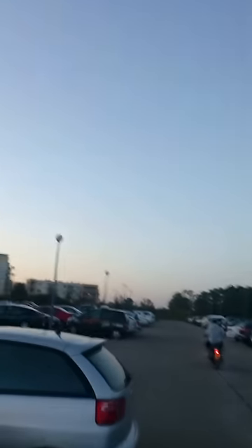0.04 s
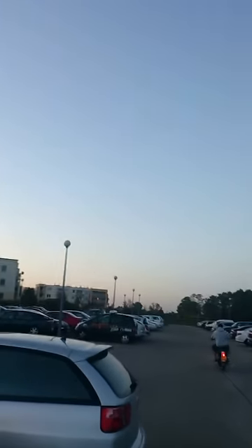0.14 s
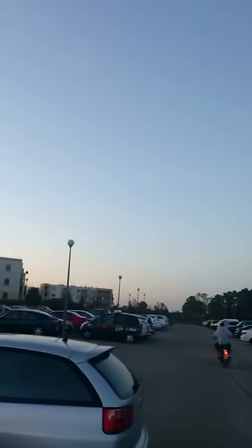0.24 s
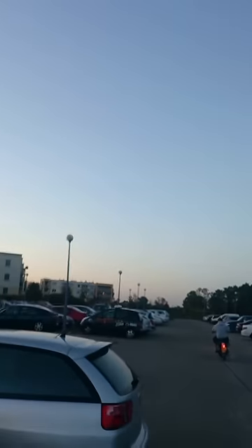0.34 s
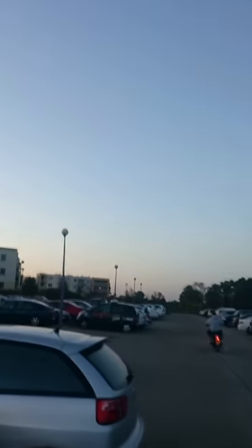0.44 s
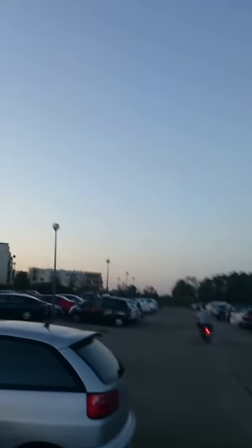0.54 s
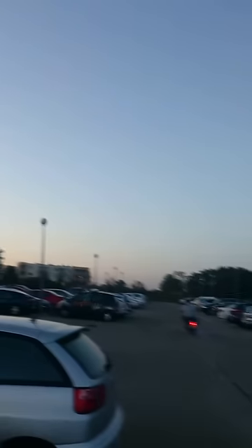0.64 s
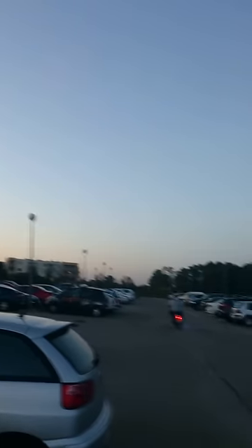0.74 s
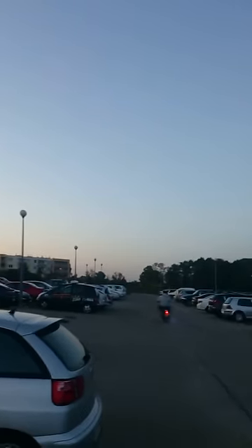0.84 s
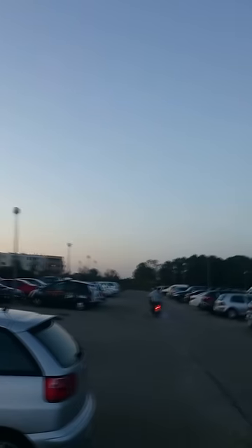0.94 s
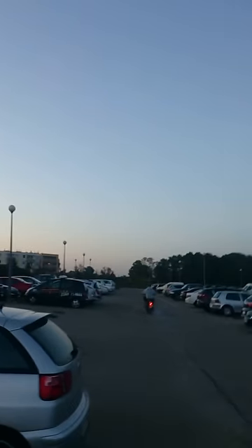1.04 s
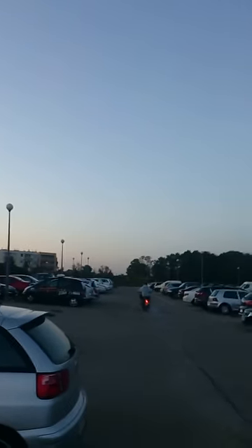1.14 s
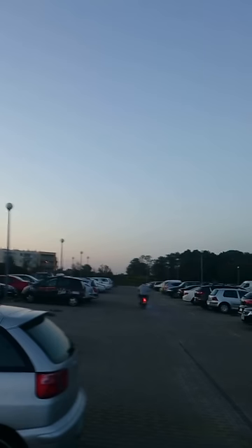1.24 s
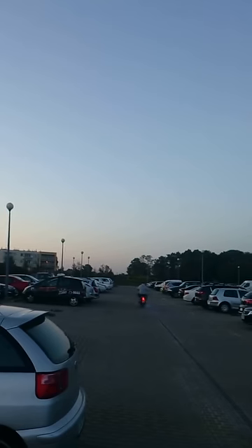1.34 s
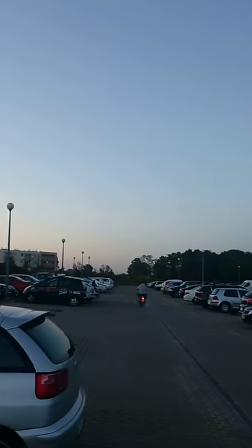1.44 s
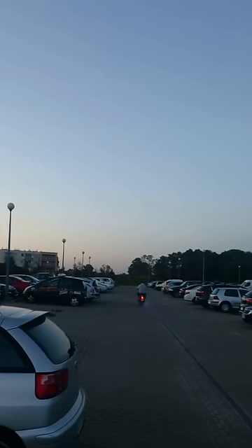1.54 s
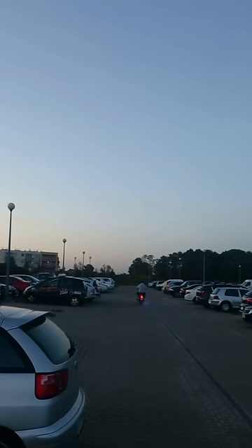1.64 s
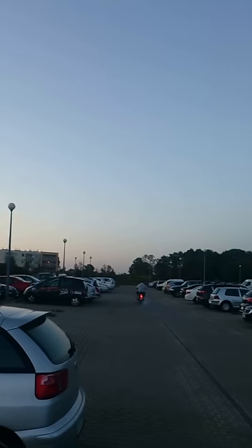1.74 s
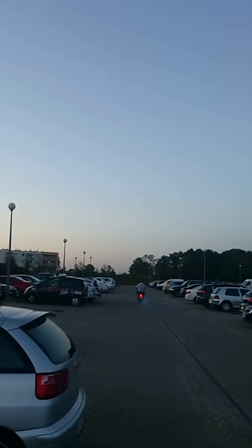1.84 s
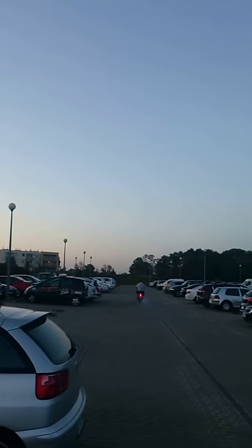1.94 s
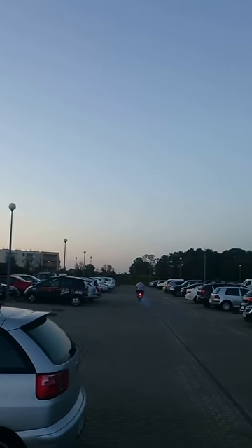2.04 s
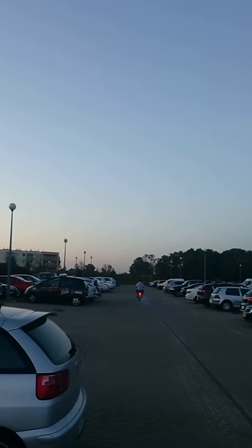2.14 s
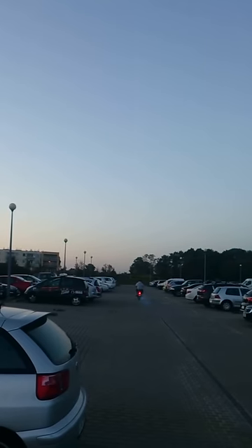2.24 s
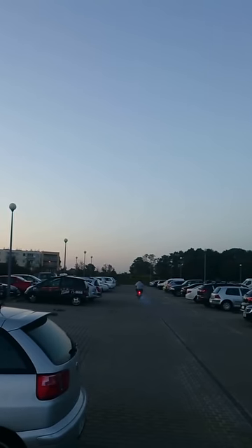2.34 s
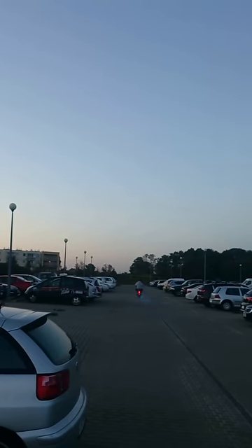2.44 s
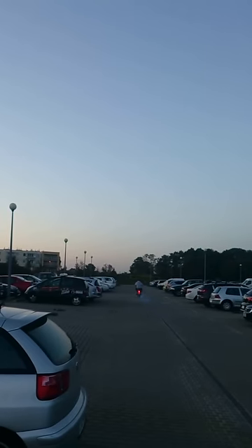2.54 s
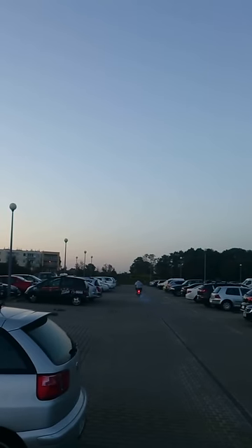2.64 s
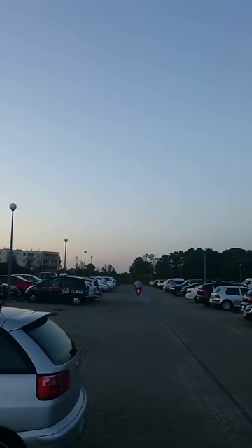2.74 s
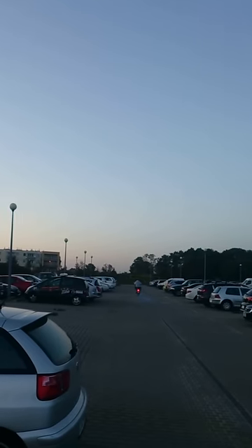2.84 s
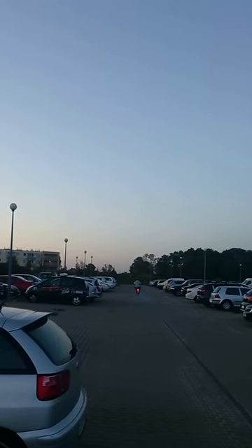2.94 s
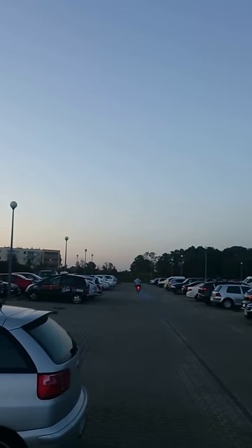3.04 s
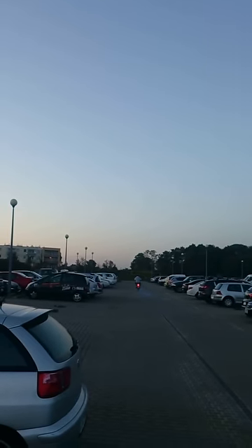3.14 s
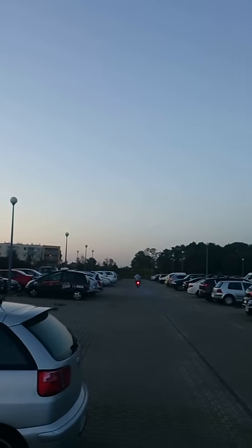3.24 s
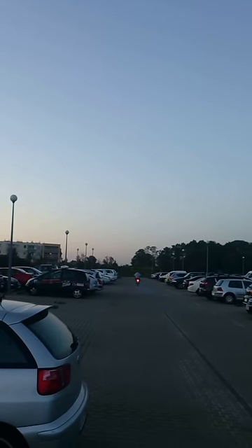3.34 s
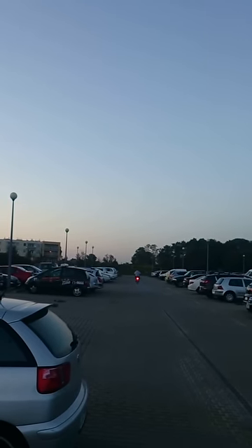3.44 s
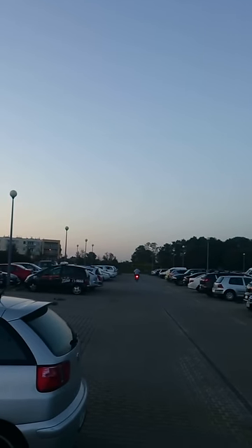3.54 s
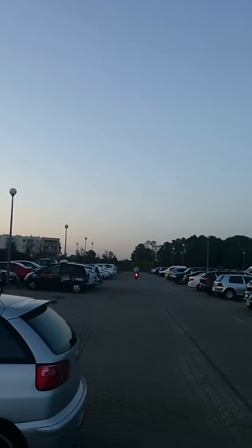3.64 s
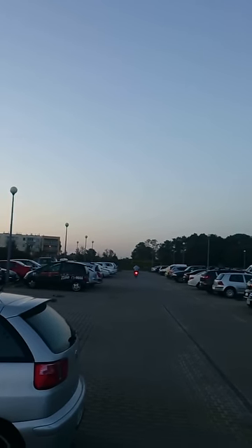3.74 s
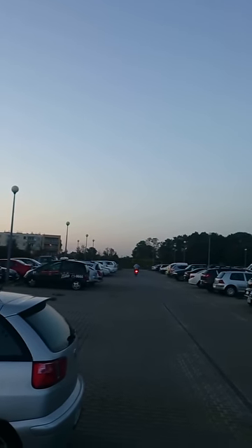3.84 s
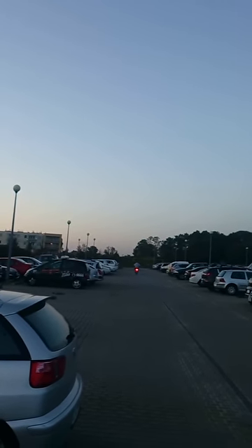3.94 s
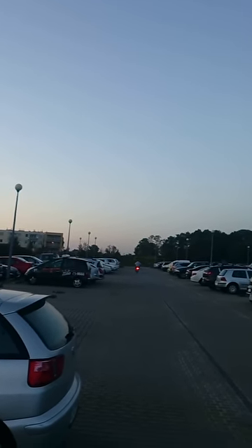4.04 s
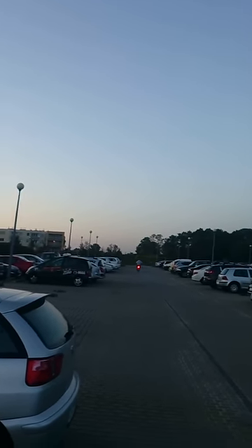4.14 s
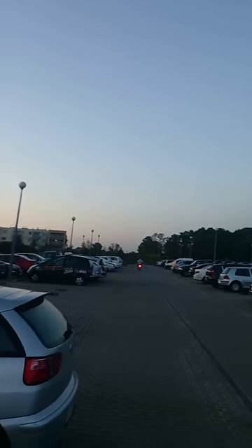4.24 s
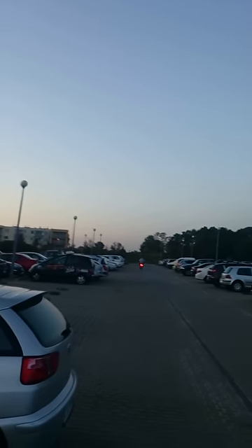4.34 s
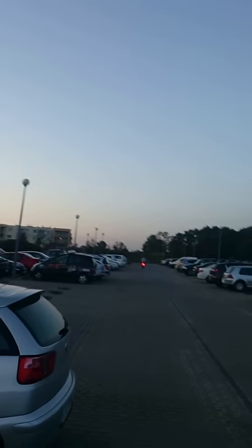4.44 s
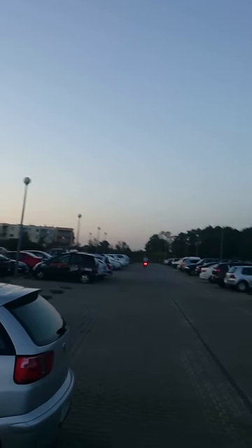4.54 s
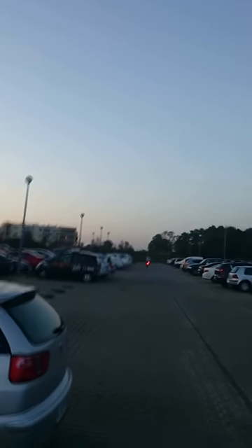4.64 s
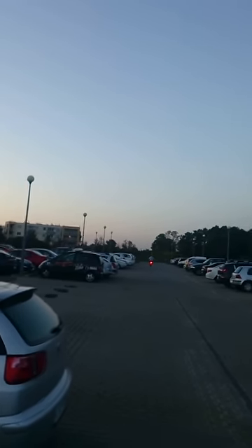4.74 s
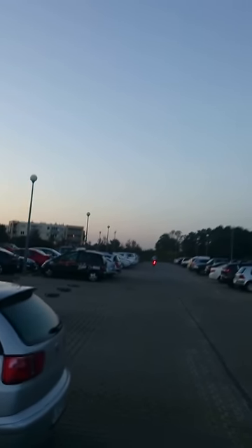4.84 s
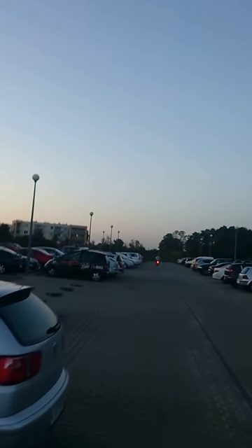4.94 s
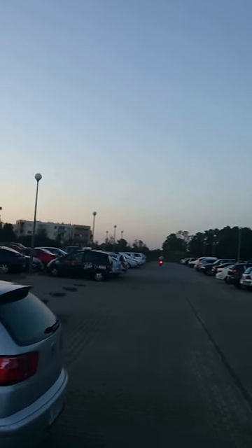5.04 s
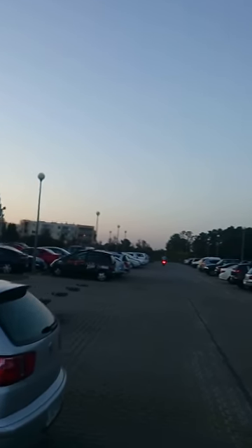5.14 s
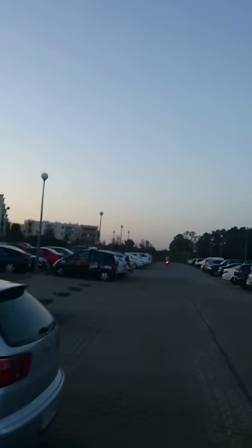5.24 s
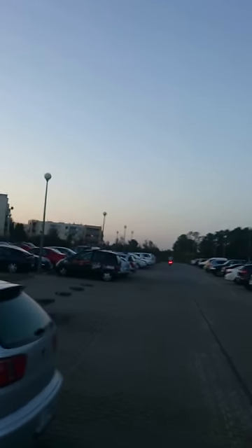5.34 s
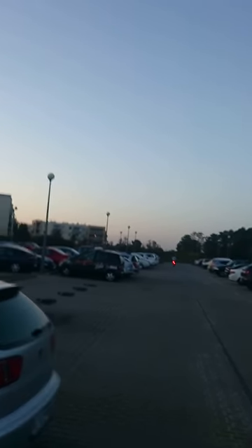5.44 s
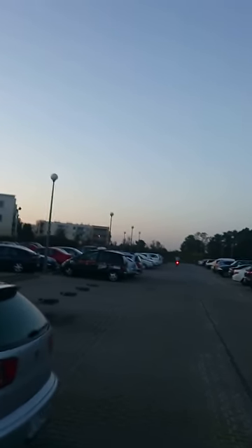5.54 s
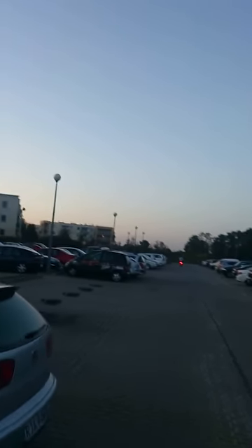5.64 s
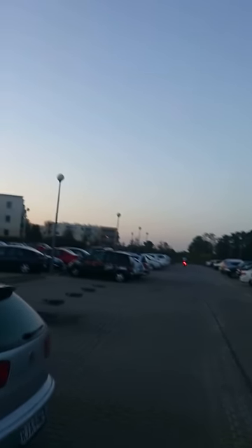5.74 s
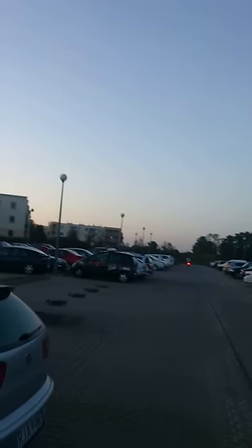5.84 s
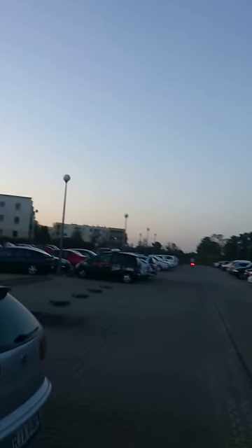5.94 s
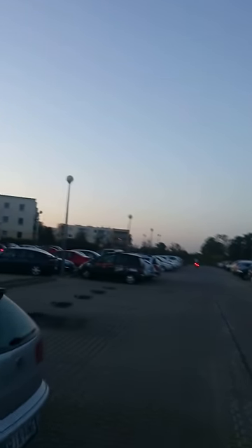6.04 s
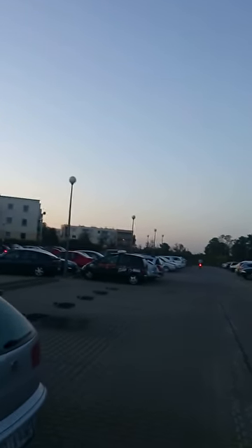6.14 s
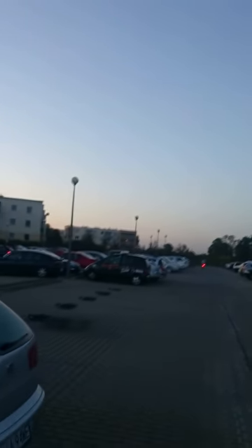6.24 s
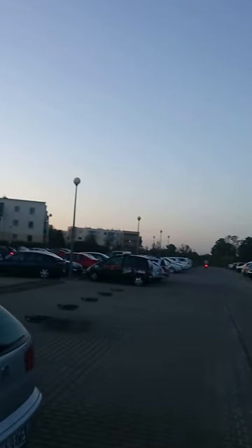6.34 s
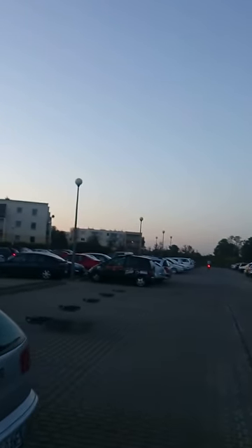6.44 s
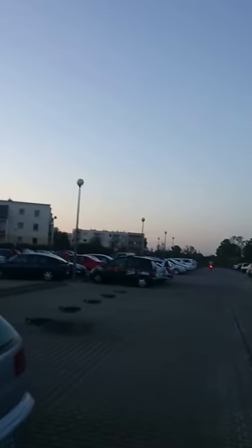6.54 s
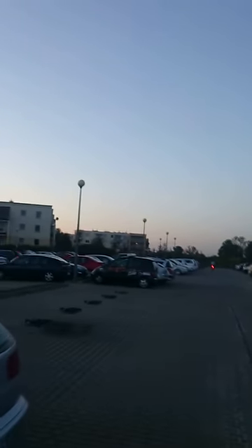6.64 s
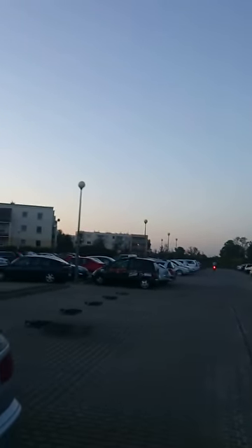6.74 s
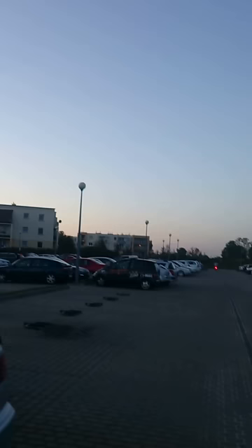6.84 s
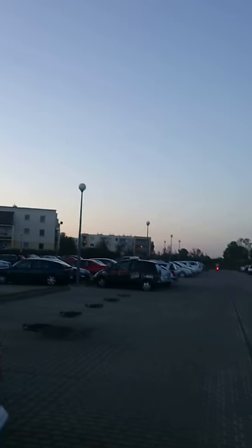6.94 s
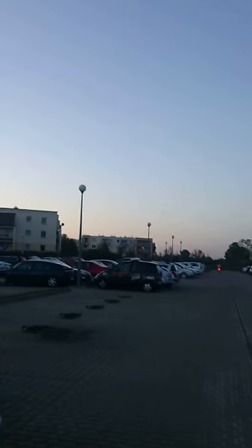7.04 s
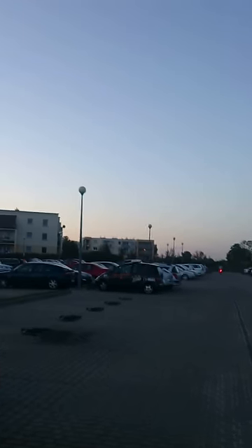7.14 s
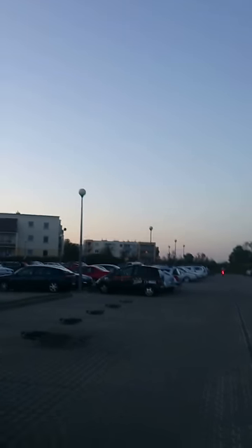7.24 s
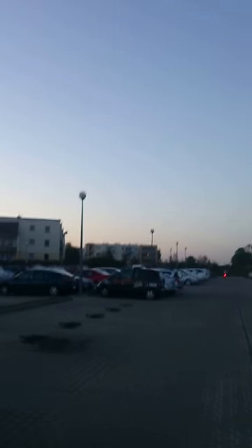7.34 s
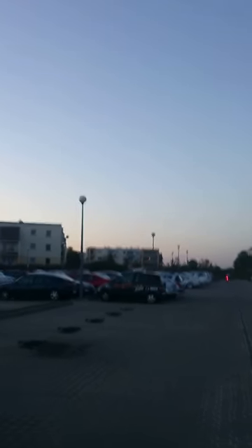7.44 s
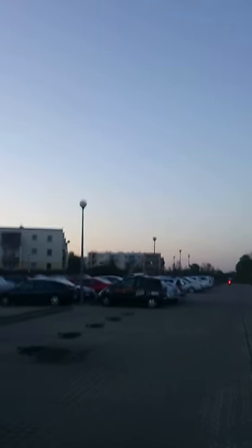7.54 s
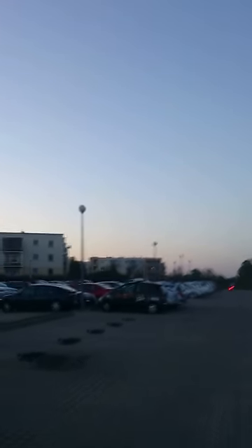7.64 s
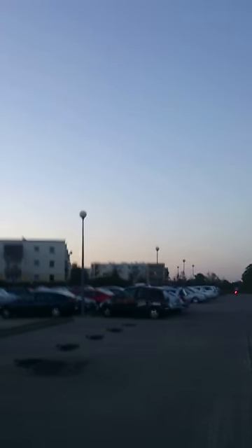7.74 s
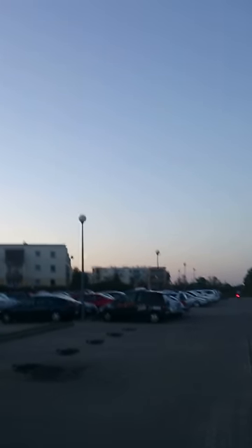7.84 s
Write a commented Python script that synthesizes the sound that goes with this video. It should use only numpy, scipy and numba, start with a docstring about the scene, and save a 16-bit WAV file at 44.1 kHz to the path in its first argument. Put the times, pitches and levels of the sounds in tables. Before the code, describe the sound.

A small two-stroke motorcycle, already close, accelerates away with a loud, raspy buzz rising for a second. A few separate pops mark the gear change, then a lower, quieter second pull drones on for nearly two seconds. The throttle closes and it coasts off in irregular little bursts, growing faint. Open car park, short reflections off parked cars, soft breeze and far traffic, handheld stereo microphone.

```python
"""A car park: a small two-stroke motorcycle pulls away, two pulls under load with a gear change between,
then coasts off firing only in bursts. Each firing kicks resonators for the exhaust pipe, chamber, tailpipe
and cylinder fins, with noise for the turbulent gas; unfired strokes only pump softly. Decaying noise makes
the echoes off parked cars and far buildings; shaped noise makes the light breeze and far traffic beneath."""
import sys
import numpy as np
from scipy import signal
from scipy.fft import rfft, irfft, next_fast_len
from scipy.io import wavfile
from numba import njit

SR = 44100
rng = np.random.default_rng(int(sys.argv[2]) if len(sys.argv) > 2 else 0)


def unload_audio(sound):
    """Save the sound as a 16-bit wav file, at the path given as the first command line argument."""
    columns = np.transpose(np.atleast_2d(sound))
    # keep every value between -1 and 1, then stretch to whole-number steps
    steps = np.round(np.clip(columns, -1, 1) * 32767)
    wavfile.write(sys.argv[1], SR, steps.astype(np.int16))


N = 348390

# engine speed through each pull, climbing in surges: (time [s], firing rate [1/s])
PULL_SPEED = [
    [(0.01, 62.6), (0.065, 63.3), (0.098, 61.0), (0.13, 60.9), (0.178, 64.2), (0.302, 65.4), (0.355, 68.8),
     (0.42, 67.3), (0.478, 70.9), (0.51, 71.2), (0.55, 69.8), (0.59, 71.2), (0.674, 73.4), (0.725, 69.9),
     (0.799, 75.6), (0.878, 75.4), (0.944, 76.6), (0.997, 74.6), (1.03, 76.5)],
    [(1.335, 56.7), (1.41, 55.2), (1.47, 56.4), (1.53, 56.2), (1.59, 57.6), (1.67, 56.4), (1.73, 57.6),
     (1.805, 55.3), (1.85, 57.8), (1.995, 58.6), (2.047, 57.3), (2.09, 60), (2.165, 58.4), (2.25, 59.6),
     (2.302, 57.8), (2.352, 59.8), (2.42, 59.7), (2.465, 60.7), (2.519, 59.8), (2.575, 62.3), (2.625, 60.8),
     (2.715, 61.8), (2.756, 59.8), (2.813, 62.3), (2.93, 62.7), (2.98, 61.9), (3.037, 64), (3.075, 62.4),
     (3.142, 61.3)],
]
# firing level over each pull: (start level [dB], end level [dB])
PULL_LEVELS = [(-12.5, -14.5), (-20.5, -18)]
# firing bursts off the throttle: (first firing [s], last firing [s], firings [count], burst level [dB],
# first firing below it by [dB], fade to the last [dB], tailpipe brightness [dB])
BURSTS = [(1.055, 1.056, 1, -13, 2, 0, -1), (1.113, 1.124, 2, -15.5, 13, 0, 0),
          (1.205, 1.206, 1, -14, 1, 4, 0), (1.275, 1.274, 1, -14.5, 0.5, 0, -2),
          (3.213, 3.232, 2, -22, -2.5, 0, -1), (3.32, 3.336, 2, -20.5, 0, 0, -0.5),
          (3.419, 3.435, 2, -19, 0.5, 0, 0.5), (3.518, 3.535, 2, -20, -3, 0, -1.5),
          (3.624, 3.641, 2, -21.5, -4, 0, 0), (3.727, 3.744, 2, -22, -3.5, 0, 0),
          (3.814, 3.849, 3, -19.5, 9, 1, 1.5), (3.92, 3.955, 3, -20, 4, 1, 0),
          (4.045, 4.063, 2, -21, -2, -2, 0.5), (4.134, 4.283, 9, -21.5, -2, 5, -1),
          (4.36, 4.433, 5, -21, 1.5, 4, 0), (4.513, 4.606, 6, -22.5, -3, 3, 0),
          (4.668, 4.748, 5, -25, 7, 3.5, 0.5), (4.767, 4.805, 3, -23.5, 2, 4.5, -1),
          (4.888, 4.97, 5, -23.5, 0, 7.5, -0.5), (5.038, 5.082, 3, -24.5, 3, 2, -1),
          (5.215, 5.236, 2, -23.5, 0.5, 0, 0.5), (5.293, 5.35, 4, -25.5, 0.5, 2.5, 1),
          (5.495, 5.547, 4, -22, 11, 9.5, 2.5), (5.695, 5.756, 5, -22, 5.5, 10.5, 1),
          (5.872, 5.938, 5, -22.5, 7, 11, -0.5), (6.064, 6.135, 5, -22, 8.5, 8.5, -0.5),
          (6.277, 6.297, 2, -36.5, -2.5, 2, -0.5), (6.332, 6.419, 6, -26.5, 8, 5.5, 0),
          (6.435, 6.504, 5, -26, 7, 7.5, -2), (6.623, 6.699, 5, -24.5, 12, 10, -1),
          (6.718, 6.769, 4, -30.5, 5, 9, 3), (6.961, 6.994, 3, -25, 4.5, 14, 0.5),
          (7.133, 7.227, 6, -25, 8.5, 4, 1.5), (7.388, 7.422, 3, -27, 6.5, 10.5, 0.5),
          (7.554, 7.618, 4, -26.5, 4, 0.5, -2), (7.791, 7.858, 4, -27, 4, 4.5, -2)]
# engine speed off the throttle: (time [s], crank speed [turns/s])
COASTING_SPEED = [(1, 74), (1.3, 70), (3, 59), (5, 52), (5.4, 55), (5.55, 61), (5.8, 60), (5.95, 56),
                  (6.2, 56), (8, 51)]
# unfired strokes re the level of the burst before them: (time [s], low pumping [dB], upper pumping [dB])
UNFIRED_LEVELS = [(1, -17, -13), (3.2, -16.5, -20), (3.9, -19.5, -17.5), (4.3, -18.5, -15.5),
                  (4.8, -15, -12), (5.15, -16, -17), (5.4, -13.5, -21), (5.6, -15, -11), (5.8, -18, -7.5),
                  (6.0, -16.5, -30), (6.2, -18.5, -25), (6.55, -16.5, -14), (6.9, -9.5, -18),
                  (7.3, -20, -23), (7.5, -16.5, -24), (7.9, -16, -18)]
THUMP_START_DB, THUMP_END_DB, THUMP_COASTING_DB = 1.5, -4, -5.5   # the bass thins as a pull runs out
UNEVEN_DB = 1.0   # random spread of firing level off the throttle
SURGE, SAG = .075, .055   # share by which firing speeds the crank up, and coasting slows it down
LOOSE_SPREAD = 2.2   # ragged firings off the throttle scatter the modes this many times more

# bass push of each firing: (frequency [Hz], width [Hz], level [dB])
THUMP_MODES = [(180, 91, -7.5), (266, 50, -13.5)]
# deeper bass push, above the boom: (frequency [Hz], width [Hz], level [dB])
THUD_MODES = [(108, 51, -24.5)]
# thud re firing: (time [s], level [dB])
THUD_LEVEL = [(0, -8.5), (.6, 2.5), (1.0, -1.5), (1.35, 1.5), (1.55, 12.5), (2.0, 6.5), (2.6, 0),
              (3.15, -5), (3.3, -17), (7.9, -16)]
# pipe before the gas heat shifts it: (frequency [Hz], width [Hz], level [dB])
PIPE_MODES = [(482.8, 43.2, -0.5), (633, 45, -19)]
# exhaust chamber, rings under load: (frequency [Hz], width [Hz], level [dB])
CHAMBER_MODES = [(378.3, 76, 0.026)]
# bark, rings off the throttle: (frequency [Hz], width [Hz], level [dB])
BARK_MODES = [(371, 67, 0.0019)]
# upper pipe: (frequency [Hz], width [Hz], level [dB])
UPPER_PIPE_MODES = [(766, 75, -12), (881.4, 71, -4.5), (983, 130, -7.5)]
# tailpipe: (frequency [Hz], width [Hz], level [dB])
TAILPIPE_MODES = [(1605, 105, 1.2), (1755, 115, 2.5)]
# tip of the tailpipe: (frequency [Hz], width [Hz], level [dB])
TAIL_TIP_MODES = [(2000, 150, 10), (1880, 180, 1)]
# front of the pressure wave: (frequency [Hz], width [Hz], level [dB])
BLAST_MODES = [(1123, 320, 6.6)]
# low exhaust boom: (frequency [Hz], width [Hz], level [dB])
BOOM_MODES = [(67.6, 47, -27)]
# exhaust balance re firing: (time [s], pipe [dB], chamber [dB], bark [dB], tailpipe [dB], tail tip [dB],
# boom [dB], blast [dB])
EXHAUST_BALANCE = [(0, 0.5, 3.5, -12, -1, 0, -1, 1.5), (.8, -4.5, 8.5, -11, -5.5, 3, 7, 3),
                   (1.3, 0.5, 1, -2, -2, 5.5, 0, -1), (1.7, -5, 5.5, -12.5, 3, 4.5, 4, 2.5),
                   (3.15, -6.5, 4, -20, 1.5, 5, -17, 1.5), (3.3, 0, -2, -1.5, 2, 6, -17, 3),
                   (4.3, -3, -35, 1.5, 3.5, -2, -1, 1), (5.5, 3.5, -16, 4, 0.5, -5, -18, 0),
                   (6.8, 3, -16, 1.5, 1, -20, -7.5, 0), (7.9, -1.5, -20, 0.5, -9.5, -15.5, -13, -19)]
RETURN_S, RETURN_DB = .0064, -1   # the wave thrown back by the chamber cone kicks the tailpipe again
BAFFLE_LEAK = 0.44   # share that passes the baffle

# mid-treble exhaust rasp: (frequency [Hz], width [Hz], level [dB])
RASP_MODES = [(2458, 80, -12), (2894, 172, -12.5), (3370, 256, -12), (3836, 104, -23)]
# rasp re firing: (time [s], level [dB])
RASP_LEVEL = [(0, 5), (.5, 11), (1.0, 10.5), (1.5, 6.5), (2.6, 12.5), (3.1, 3), (3.5, 3.5), (4.3, -5),
              (5.3, -10), (6.7, 1.5), (7.9, -14)]
# cylinder fins: (frequency [Hz], width [Hz], level [dB])
FIN_MODES = [(5208, 370, -1), (5080, 800, -14), (5630, 760, -12.5)]
# hiss of the escaping gas: (frequency [Hz], width [Hz], level [dB])
GAS_HISS_MODES = [(7050, 600, -8.5), (8800, 1670, -13), (10660, 1700, -16)]
# treble balance re firing: (time [s], fin rattle [dB], crack [dB], gas hiss [dB])
TREBLE_BALANCE = [(0, -15.5, 16, -11.5), (.2, -25, -31, -13.5), (.5, -29.5, -39, -19.5),
                  (.77, -18, 18.5, -14.5), (1.0, -25.5, 1, -21), (1.35, -19, 6, -19),
                  (1.75, -23, -0.5, -27), (1.9, -18.5, 6.5, -21), (2.04, -22.5, 4, -21),
                  (2.27, -15, 12, -20), (2.57, -18.5, 13, -17.5), (2.96, -29.5, -3.5, -26.5),
                  (3.12, -24, 2.5, -30), (3.8, -24.5, -1.5, -29), (4.25, -17, -8, -44),
                  (4.6, -32.5, -14, -43), (5.65, -24, -15.5, -34.5), (6.4, -29.5, -31, -30),
                  (7.9, -36.5, -32, -43)]
# low pumping of unfired strokes: (frequency [Hz], width [Hz], level [dB])
PUMPING_MODES = [(225.3, 43, -1.5), (267, 58, -12)]
# upper pumping of unfired strokes: (frequency [Hz], width [Hz], level [dB])
UPPER_PUMPING_MODES = [(361.4, 24, -9), (488, 24, -7), (614, 36, -10.5), (840, 29, -15)]

# lasting warmth; hot gas carries sound faster and lifts the pipe modes: (time [s], pitch shift [share])
LASTING_HEAT = [(0, 0.077), (.1, 0.01), (.3, 0.04), (.6, 0.018), (1.0, 0.0051), (1.15, 0.038),
                (1.35, -0.048), (2.2, -0.015), (3.1, -0.0085), (3.3, 0.0057), (5.5, 0.0016), (7.9, -0.03)]
LIFT_AT_60_PER_S, COOLING_S = 0.108, 0.028   # each firing adds heat that soon leaves
UPPER_LIFT, TAIL_LIFT, FIN_LIFT = 0.23, 0.34, 0.54   # share of the lift felt by upper pipe, tailpipe, treble
GRIT_DB, GRIT_S = 6, .0009   # the gas comes in lumps, up to this much louder or softer

START_M, SPEED_M_PER_S = 4.0, 9.0   # the bike draws away
ECHO_GAIN_DB_PER_M = 0.1383   # echoes gain on the direct sound with distance
ECHO_DB, ECHO_T60_S = -15.5, .075   # scatter off the nearest cars

# breeze and far traffic colour: (frequency [Hz], relative level [dB per Hz])
AIR_COLOUR = [(20, -0.5), (50, 1), (120, -15.5), (250, -5.5), (500, -6), (1000, -7.5), (1700, -22.5),
              (2400, -38), (5300, -33), (9000, -42), (15000, -68)]
# the airy hiss swells and sinks: (time [s], level [dB])
AIR_HISS_SWELL = [(0, 34), (4.5, 8), (5.201, 5.5), (5.8, 17), (6.5, 5), (7.1, 10.5), (7.401, 4),
                  (7.9, -4.5)]
AIR_DB = -53   # level before the gusts and hiss swell

# colour between the microphone ports: (frequency [Hz], left minus right [dB])
PORT_BALANCE = [(60, -14), (110, -6.5), (200, -5.5), (380, -5), (700, -4.5), (1290, -9.5), (2380, -4.5),
                (4400, 2), (8120, -4), (15000, 3.5)]
# arrival between the microphone ports: (frequency [Hz], phase [rad])
PORT_PHASE = [(0, 0), (1030, .1), (1720, 1.3), (2400, 1.6), (3100, 2.2), (3800, 4.2), (4500, 5.4),
              (5200, 6.2), (7200, 8), (8600, 12.8), (10000, 14.6), (11400, 13.8), (13400, 18),
              (15400, 19.5)]
CUTOFF_HZ = 16050


def engine():
    """Impulsive firings excite the exhaust, shock crack and fins; unfired strokes pump softly."""
    (s, db, thump_db, bright_db, loose), (idle_s, idle_db) = strokes()
    s = s + .00005 * rng.standard_normal(len(s))   # ignition scatter
    kick = amp(db + .6 * rng.standard_normal(len(s)))
    lift = heat_lift(s)
    low = bass(s, kick, thump_db) + amp(-3.5) * exhaust(s, kick, lift, amp(bright_db), loose)
    return low + rasp(s, kick) + pumping(idle_s, idle_db, lift) + treble(s, kick, lift)


def strokes():
    """The crank's speed times fired strokes (s, dB, thump dB, brightness dB, looseness) and unfired (s, dB)."""
    fired, idle = [], []
    for pull, level_db in zip(PULL_SPEED, PULL_LEVELS):
        s, per_s = np.transpose(pull)
        t = np.arange(s[0], s[-1], 1 / SR)
        turns = np.cumsum(np.interp(t, s, per_s)) / SR
        at = np.interp(np.linspace(0, turns[-1], round(turns[-1]) + 1), turns, t)
        ends = s[[0, -1]]
        levels = np.interp(at, ends, level_db)
        thump_db = np.interp(at, ends, [THUMP_START_DB, THUMP_END_DB])
        fired += zip(at, levels, thump_db, 0 * at, 1 + 0 * at)
    starts = sorted([b[0] for b in BURSTS] + [p[0][0] for p in PULL_SPEED] + [N / SR + 0.025])
    for first, last, count, db, first_below_db, fade_db, bright_db in BURSTS:
        count = round(count)
        levels = np.r_[db - first_below_db, db - np.linspace(0, fade_db, count - 1)]
        levels += rng.normal(0, UNEVEN_DB, count)
        share = np.linspace(0, 1, count)
        share += SURGE * share * (1 - share)   # gaps shorten
        tone = np.repeat([[THUMP_COASTING_DB], [bright_db], [LOOSE_SPREAD]], count, axis=1)
        fired += zip(first + share * (last - first), levels, *tone)
        # unfired strokes fill the time to the next burst or pull
        following = min(s for s in starts if s > last + .005)
        crank_speed = np.interp(last, *np.transpose(COASTING_SPEED))
        turns = max(round((following - last) * crank_speed), 1)
        share = np.linspace(0, 1, turns + 1)[1:-1]
        share -= SAG * share * (1 - share)   # gaps lengthen
        idle += [(s, db) for s in last + share * (following - last)]
    return np.transpose(sorted(fired)), np.transpose(idle)


def bass(s, kick, thump_db):
    """Each firing pushes wide low resonances: thump and deeper thud."""
    thump = ring(THUMP_MODES, s, kick * amp(thump_db), .4, -50, .01)
    thud = ring(THUD_MODES, s, kick * over_time(THUD_LEVEL, s)[0], .4, -50, .01)
    return butter(thump + thud, 530, "low", order=1)


def exhaust(s, kick, lift, bright, loose):
    """Pressure pulses ring pipe, chamber and tailpipe modes, tuned by the heat of the gas."""
    pipe_gain, chamber, bark, tail_gain, tip, boom, blast = over_time(EXHAUST_BALANCE, s)
    pipe = ring(PIPE_MODES, s, kick * pipe_gain, .6, -40, .03, 1 + lift)
    pipe += ring(CHAMBER_MODES, s, kick * chamber, .6, -40, .03, 1 + lift)
    pipe += ring(BARK_MODES, s, kick * bark, .8 * loose, -40, .03, 1 + lift)
    upper_kick = kick * np.sqrt(blast * bright)
    pipe += ring(UPPER_PIPE_MODES, s, upper_kick, .8 * loose, -38, .03, 1 + UPPER_LIFT * lift)

    tail_kick = kick * tail_gain * bright
    tail_s = np.r_[s, s + RETURN_S]
    tail_kicks = np.r_[tail_kick, tail_kick * amp(RETURN_DB)]
    tail_pitch = 1 + TAIL_LIFT * lift
    tail = ring(TAILPIPE_MODES, tail_s, tail_kicks, np.r_[loose, loose], -33, .025, tail_pitch)
    tail += ring(TAIL_TIP_MODES, s, kick * tip * bright, loose, -33, .02, tail_pitch)

    out = even(butter(pipe, 1490, "low", order=1), 307, "high", order=2) + even(tail, 804, "high", order=1)
    out = even(out, 1870, "low", order=4)
    baffled = signal.lfilter(*signal.iirnotch(1370, 4.0, fs=SR), out)
    out = BAFFLE_LEAK * out + (1 - BAFFLE_LEAK) * baffled
    front = ring(BLAST_MODES, s, kick * blast * bright, loose, -24, 0.03)
    out += amp(-11) * even(front, 2000, "low", order=2)
    return out + butter(ring(BOOM_MODES, s, kick * boom, 0.47, -47.0, 0.0073), 200, "low", order=1)


def heat_lift(s):
    """Gas heat lifts the modes by a share: a smoothed firing rate plus lasting warmth."""
    keep = np.exp(-1 / (COOLING_S * SR))
    smoothed = signal.lfilter([1 - keep], [1, -keep], clicks(s, 1))
    rate = signal.lfilter([1 - keep], [1, -keep], smoothed) * SR
    return LIFT_AT_60_PER_S * rate / 60 + np.interp(np.arange(N) / SR, *np.transpose(LASTING_HEAT))


def rasp(s, kick):
    """Gas turbulence and firing kicks sound a narrow mid-treble band."""
    hiss, = over_time(RASP_LEVEL, s)
    out = ring(RASP_MODES, s, kick * hiss, 0.8, -17.5, 0.032, soft=True)
    out = butter(out, 3250, "high", order=2)
    return amp(-10.0) * butter(out, 3700, "low", order=4)


def treble(s, kick, lift):
    """A central shock crack, with fin rattle and gas hiss spread wide by separate noise on each side."""
    rattle, crack, gas = over_time(TREBLE_BALANCE, s)
    crack_kick = kick * crack * amp(1.8 * rng.standard_normal(len(s)))
    shock = ring([(9050, 920, -6.0), (6700, 1400, -20.5)], s, crack_kick, 2.8, -20.0, 0.021)
    pitch = 1 + FIN_LIFT * lift
    fizz = []
    for _ in range(3):   # shared, left, right
        fins = ring(FIN_MODES, s + 0.0034, kick * rattle, 1.7, -9, 0.06, pitch, soft=True)
        hiss = ring(GAS_HISS_MODES, s, kick * gas, 3.4, -6.5, 0.087, pitch)
        fizz.append(butter(fins, 7500, "low", order=2) + hiss)
    out = amp(-6.5) * shock + amp(0.5) * (fizz[0] + 0.84 * np.array(fizz[1:]))
    return butter(butter(out, 3300, "high", order=4), 12600, "low", order=2)


def pumping(s, db, lift):
    """Unfired strokes softly excite low and upper modes tuned by the gas heat."""
    low_gain, upper_gain = over_time(UNFIRED_LEVELS, s)
    out = ring(PUMPING_MODES, s, amp(db) * low_gain, .4, -44, .05, 1 + lift, soft=True)
    out += ring(UPPER_PUMPING_MODES, s, amp(db) * upper_gain, .4, -44, .05, 1 + lift, soft=True)
    return butter(butter(out, 1030, "low", order=4), 170, "high", order=2)


def ring(modes, times, gains, spread_db, puff_db, puff_t60, pitch=1, soft=False):
    """Strokes kick all modes in phase (soft: alternating phases); turbulent gas keeps feeding them."""
    out, gas = np.zeros(N), amp(puff_db) * puffs(times, gains, puff_t60)
    scatter = rng.standard_normal((len(times), len(modes)))
    for k, (hz, width_hz, db) in enumerate(modes):
        decay = np.exp(-np.pi * width_hz / SR)
        turn = 2 * np.pi * pitch * hz / SR + np.zeros(N)
        kick = gas - clicks(times, gains * amp(spread_db * scatter[:, k]))
        out += (-1) ** (k * soft) * amp(db) * mode(kick, decay, turn)
    return out


@njit
def mode(kick, decay, turn):
    """One ringing mode whose pitch (radians per sample) may glide."""
    out, state = np.empty(len(kick)), 0j
    for n in range(len(kick)):
        state = state * decay * complex(np.cos(turn[n]), np.sin(turn[n])) + kick[n]
        out[n] = state.real
    return out


def puffs(times, gains, t60):
    """Lumpy turbulence noise that bursts out at each time and dies away."""
    size = int(GRIT_S * SR)
    lumps = np.repeat(amp(GRIT_DB * rng.uniform(-1, 1, N // size + 1)), size)[:N]
    envelope = signal.lfilter([1], [1, -amp(-60 / (t60 * SR))], clicks(times, gains))
    return envelope * rng.standard_normal(N) * lumps


def clicks(times, gains):
    """One click per time, over a floor too small to hear."""
    out = np.full(N, 1e-18)
    np.add.at(out, np.clip(np.round(times * SR).astype(int), 0, N - 1), gains)
    return out


def amp(db):
    """dB to gain."""
    return 10 ** (np.asarray(db) / 20)


def over_time(rows, s):
    """The dB columns of a time table as gains at times s."""
    return [amp(np.interp(s, np.array(rows)[:, 0], c)) for c in np.transpose(rows)[1:]]


def at_hz(points, hz):
    """A spectrum table read on a log-frequency axis."""
    table_hz, values = np.transpose(points)
    return np.interp(np.log(hz + 1), np.log(table_hz + 1), values)


def butter(x, hz, kind, order):
    """Butterworth high- or low-pass."""
    return signal.sosfilt(signal.butter(order, hz, kind, fs=SR, output="sos"), x)


def even(x, hz, kind, order):
    """Butterworth run both ways: the pulse keeps its single sharp front."""
    return signal.sosfiltfilt(signal.butter(order, hz, kind, fs=SR, output="sos"), x)


def distance_m(s):
    """How far away the bike is, at steady speed."""
    return START_M + SPEED_M_PER_S * s


def car_park(x, echo_db, t60, far_db, far_t60, dull_hz):
    """Echoes off parked cars and far buildings; long waves scatter less and reach both sides alike."""
    t = np.arange(int(.8 * SR)) / SR
    near = amp(-60 * t / t60) * (t > .006)
    far = amp(far_db - 60 * t / far_t60) * (t > .05)
    shared, left, right = rng.standard_normal((3, len(t))) * (near + far)
    long_waves = amp(-7) * butter(shared, 1800, "low", order=2)
    short_waves = butter(np.array([left, right]), 1400, "high", order=2)
    tail = butter(long_waves + short_waves, dull_hz, "low", order=1)
    tail = amp(echo_db) * tail / np.sqrt(np.sum(tail ** 2, axis=1, keepdims=True))
    return signal.fftconvolve(x, tail, axes=1)[:, :N]


def air():
    """Breeze and far traffic as shaped noise, partly separate at each port, with gusty lows and swelling hiss."""
    hz = np.fft.rfftfreq(N, 1 / SR)
    shared, own = rng.standard_normal(N), rng.standard_normal((2, N))
    own_share = np.interp(hz, [60, 200, 1000, 3000], [.15, 0.13, 0.093, 0.94])
    mix = np.sqrt(1 - own_share) * rfft(shared) + np.sqrt(own_share) * rfft(own)
    noise = irfft(mix * amp(at_hz(AIR_COLOUR, hz)) * (hz > 18), N)
    gusts = np.interp(np.arange(N), np.linspace(0, N, 40), rng.standard_normal(40))
    low = butter(noise, 65, "low", order=2)
    high = butter(noise, 1760, "high", order=2)
    swell = amp(np.interp(np.arange(N) / SR, *np.transpose(AIR_HISS_SWELL)))
    moving = noise + low * (amp(2.3 * gusts) - 1) + high * (swell - 1)
    return amp(AIR_DB) * moving / np.std(noise)


def scene():
    """The bike, its echoes and the air."""
    bike = engine()
    scattered = bike * amp(ECHO_GAIN_DB_PER_M * distance_m(np.arange(N) / SR))
    echoes = car_park(scattered, echo_db=ECHO_DB, t60=ECHO_T60_S, far_db=-29.5, far_t60=1.53, dull_hz=4480)
    return bike + echoes + air()


def record(dry):
    """Two microphone ports that differ in colour and arrival; the top is cut."""
    size = next_fast_len(N + 4096)
    hz = np.fft.rfftfreq(size, 1 / SR)
    # each port takes half the difference, in opposite directions
    half = amp(at_hz(PORT_BALANCE, hz) / 2) * np.exp(.5j * np.interp(hz, *np.transpose(PORT_PHASE)))
    ports = amp(2.5) * irfft(rfft(dry, size) * [half, 1 / half], size)[:, :N]
    ports = 1.5 * np.tanh(ports / 1.5)   # the loudest peaks are rounded
    return signal.sosfilt(signal.cheby2(12, 70, CUTOFF_HZ, fs=SR, output="sos"), ports)


dry = scene()
out = record(dry)
unload_audio(out)
```